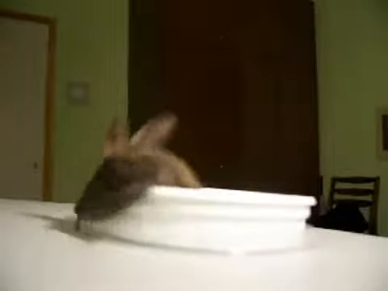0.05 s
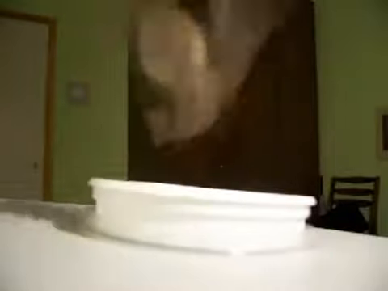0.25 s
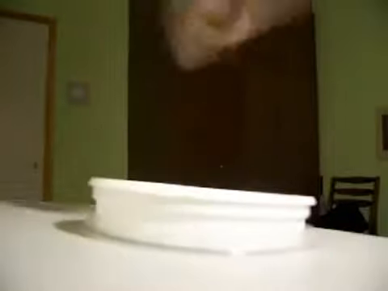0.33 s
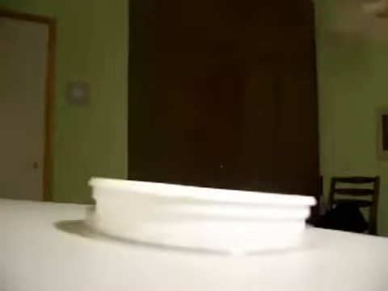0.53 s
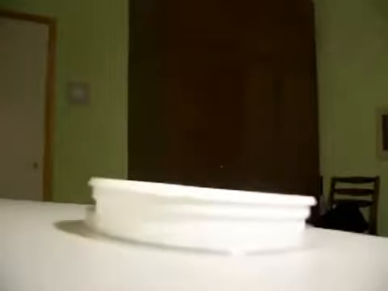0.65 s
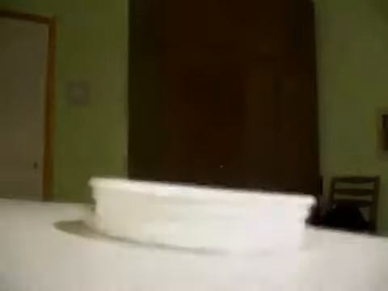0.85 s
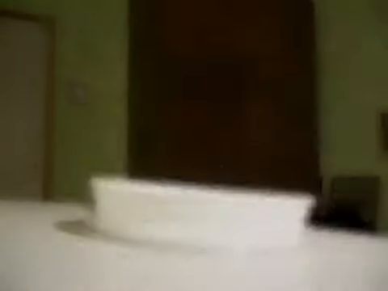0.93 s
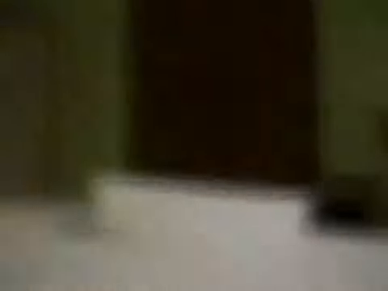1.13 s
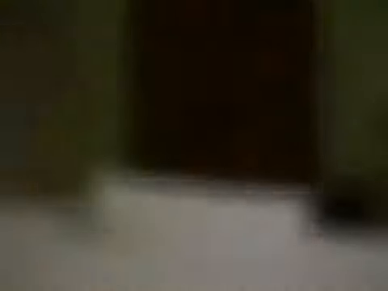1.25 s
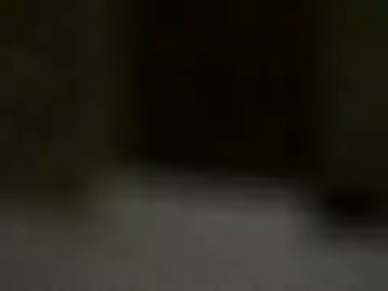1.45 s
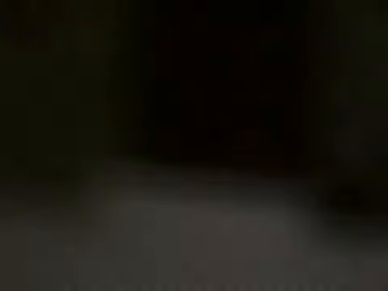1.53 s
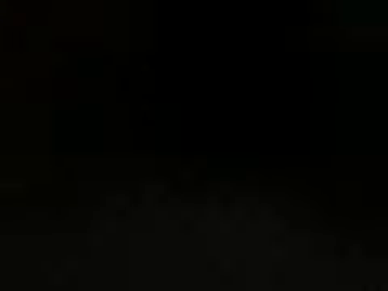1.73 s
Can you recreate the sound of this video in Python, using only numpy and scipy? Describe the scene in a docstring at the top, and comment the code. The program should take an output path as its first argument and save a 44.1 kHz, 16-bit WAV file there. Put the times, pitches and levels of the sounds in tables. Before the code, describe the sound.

Close bat wingbeats, soft low thumps of air, after a brief claw scratch on plastic.

```python
"""Bat taking off, close up

A quiet room, one microphone. A small bat scrapes its claws on a plastic tub, takes off and
flutters past at close range. Each wing stroke throws a puff of air that thumps and buffets the
microphone, with a faint rush of the wings. Behind lie room tone, hiss, hum and an electrical whine."""
import sys
import numpy as np
from scipy import signal
from scipy.fft import rfft, irfft
from scipy.io import wavfile

SR = 44100
rng = np.random.default_rng(int(sys.argv[2]) if len(sys.argv) > 2 else 0)


def pcm_store(signal):
    """Save signal as 16-bit PCM."""
    levels = np.round(np.clip(np.atleast_2d(signal), -1, 1) * 32767)
    wavfile.write(sys.argv[1], SR, levels.astype(np.int16).T)


N = 79380
T = np.arange(N) / SR
HZ = np.maximum(np.arange(N // 2 + 1) * SR / N, 1)


def amp(db):
    """Decibels to gain."""
    return 10 ** (np.asarray(db) / 20)


def unit(x):
    """Scale to rms 1."""
    return x / np.sqrt(np.mean(x ** 2))


def curve(rows):
    """Gain over time from rows of t/s, level/dB."""
    return amp(np.interp(T, *np.array(rows).T))


def colour(rows):
    """Gain over frequency from rows of f/Hz, level/dB."""
    hz, db = np.array(rows).T
    return amp(np.interp(np.log(HZ), np.log(hz), db))


def resonance(hz, width):
    """Response of one mode, 1 at its centre."""
    return 1 / (1 + 1j * (HZ ** 2 - hz ** 2) / (HZ * width))


def shape(x, response):
    """Filter by a frequency response."""
    return irfft(rfft(x) * response, N)


def noise(response):
    """Coloured noise of rms 1."""
    return unit(shape(rng.standard_normal(N), response))


def burst(at, attack_s, decay_s):
    """Envelope that swells to 1 and dies away."""
    return np.exp(-(np.minimum(T - at, 0) / attack_s) ** 2 - np.maximum(T - at, 0) / decay_s)


def excite(drive, envelope, response):
    """Gate a drive, filter it and give it the energy of its envelope."""
    return unit(shape(drive * envelope, response)) * np.sqrt(np.mean(envelope ** 2))


def wing_puffs():
    """Each stroke's vortex passes right over the microphone: a brief suction amid smaller eddies."""
    # puffs of air: t/s, thump level/dB, thump half-width/s, eddy level/dB, eddy corner/Hz, eddy decay/s
    puffs = [(.168, -38, 0.0048, -50, 90, 0.0089), (0.227, -25, 0.0082, -36, 133, 0.022),
             (0.3, -22.5, 0.0057, -37.5, 164, 0.0099), (.381, -19.5, 0.0056, -34, 90, 0.016),
             (0.4139, -13, .0016, -34, 233, .01), (.420, -7, 0.0031, -29, 185, 0.026),
             (.442, -16.5, 0.0036, -35.5, 173, 0.017), (0.502, -14, 0.0035, -28.5, 85, 0.013),
             (0.535, -21, 0.0046, -24, 95, 0.038), (0.58, -9.5, 0.0042, -18, 108, 0.03),
             (0.608, -12, 0.0089, -28, 90, 0.014), (0.639, -8, 0.0048, -26.5, 154, 0.036),
             (.676, -10, 0.0034, -31, 150, 0.028), (0.724, -15, 0.0038, -28.5, 137, 0.0075),
             (0.781, -28.5, 0.012, -39, 60, 0.015), (0.834, -16.5, 0.0066, -27.5, 102, 0.023),
             (0.896, -15, 0.0073, -27, 88, 0.023), (.964, -23, 0.0054, -46, 75, 0.024),
             (1.002, -25, 0.0062, -34.5, 79.5, 0.021), (1.04, -31, 0.0053, -54, 70, 0.014)]
    eddy_low_hz, eddy_slope = 24, 4.23
    out = np.zeros(N)
    for at, thump_db, half_width, eddy_db, corner_hz, decay in puffs:
        u = (T - at) / half_width
        vortex = (1 - u ** 2 / 2) / (1 + u ** 2 / 4) ** 3.5
        band = 1 / (1 + (HZ / corner_hz) ** eddy_slope) / (1 + (eddy_low_hz / HZ) ** 2)
        envelope = burst(at, attack_s=0.02, decay_s=decay)
        eddies = excite(rng.standard_normal(N), envelope, band)
        out += amp(eddy_db) * eddies - amp(thump_db) * vortex
    return out


def wake():
    """Stirred air rumbles on at the microphone between strokes."""
    # strength of the wake: t/s, level/dB
    levels = [(0, -58), (.14, -55.5), (.22, -37.5), (.45, -32.5), (.62, -17.5), (.76, -39), (1, -47.5),
              (1.12, -48.5), (1.28, -49), (1.4, -62), (1.8, -63)]
    # spectrum of the rumble: f/Hz, level/dB
    spectrum = [(12, -13.5), (30, -3), (55, -8.5), (100, -23.5), (200, -35), (400, -65.5), (1000, -85.5)]
    return curve(levels) * noise(colour(spectrum))


def wing_rush():
    """Air rushes over the wings as they come near, with a slight flicker."""
    # strength of the rush: t/s, level/dB
    levels = [(0, -68.5), (.35, -70.5), (.395, -62.5), (.422, -53.5), (.465, -65.5), (.51, -58.5),
              (.58, -53.5), (.645, -54), (.70, -60.5), (.79, -65.5), (.84, -61), (.865, -65.5), (.895, -58),
              (.95, -68), (1.2, -70)]
    # spectrum of the rush: f/Hz, level/dB
    spectrum = [(150, 2), (400, 1.5), (800, 1), (1300, 2), (2300, -2), (4000, -1.5), (6800, -4),
                (8500, -10.5), (10000, -22.5)]
    flicker_db, flicker_corner_hz = 1, 120
    flicker = amp(flicker_db * noise(1 / (1 + (HZ / flicker_corner_hz) ** 2)))
    return curve(levels) * flicker * noise(colour(spectrum))


def claw_scrapes():
    """Each scrape is a run of tiny slips, strongest around its own frequency, that ring the tub."""
    # scrapes: t/s, level/dB, decay/s, centre f/Hz, fall-off/(dB per squared octave, sign ignored)
    scrapes = [(0.1026, -41.5, 0.0038, 4270, 6.5), (0.109, -54.5, .004, 5500, 2),
               (.128, -60, 0.013, 5500, -6), (.1512, -42.5, 0.0015, 4200, 2),
               (0.155, -50, 0.0093, 1480, 0.5), (0.1613, -45.5, 0.0047, 3200, 2),
               (0.169, -54.5, 0.0025, 3500, -3)]
    # spectrum of claw on plastic: f/Hz, level/dB
    claw_spectrum = [(300, -4), (900, 0.5), (2000, -3), (3600, -3.5), (5400, 0), (6200, -5), (7300, -5),
                     (8200, -7.5), (10000, -12.5)]
    # modes of the tub: f/Hz, width/Hz, level/dB
    tub_modes = [(1520, 310, 8), (2570, 65, 7), (3760, 430, 4.5), (4150, 180, -10), (5170, 280, -4),
                 (6800, 330, -3)]
    slips_per_s, slip_spread_db = 10000, 3.5
    ringing = sum(amp(db) * resonance(hz, width) for hz, width, db in tub_modes)
    body = colour(claw_spectrum) * (1 + ringing)
    out = np.zeros(N)
    for at, db, decay, centre_hz, fall_db in scrapes:
        slipping = rng.random(N) < slips_per_s / SR
        strength = amp(slip_spread_db * rng.standard_normal(N))
        slips = slipping * strength * np.sign(rng.standard_normal(N))
        contact = amp(-abs(fall_db) * np.log2(HZ / centre_hz) ** 2)
        envelope = burst(at, attack_s=0.00057, decay_s=decay)
        out += amp(db) * excite(slips, envelope, body * contact)
    return out


def room_tone():
    """The quiet room and hiss with a faint wavering hum, rising a little overall."""
    # strength of the background: t/s, level/dB
    levels = [(0, -59), (.2, -54), (.5, -56.5), (.9, -53.5), (1.3, -52.5), (1.8, -53)]
    # spectrum of room and hiss: f/Hz, level/dB
    spectrum = [(25, 5), (70, 8.5), (130, 3.5), (220, 1.5), (340, -1.5), (480, -6), (800, -9.5),
                (1400, -14.5), (2800, -18), (5000, -19.5), (7000, -24.5), (8500, -30.5), (10000, -39)]
    hum = amp(-17.5) * noise(resonance(hz=325.2, width=28) ** 2)  # level relative to the room
    return curve(levels) * (noise(colour(spectrum)) + hum)


def electrical_whine(hz=4290.5):
    """One thin, steady pitch that fades up far in the background."""
    # strength of the whine: t/s, rms level/dB
    levels = [(0, -81.5), (.3, -72.5), (.9, -71), (1.8, -71)]
    return curve(levels) * np.sqrt(2) * np.sin(2 * np.pi * hz * T)


def scene():
    """The room behind, the bat close by, in mono."""
    background = room_tone() + electrical_whine()
    return (background + wake() + wing_rush() + wing_puffs() + claw_scrapes())[None]


def record(dry):
    """The microphone loses the deepest bass and the top."""
    low_hz, top_hz = 8.5, 10300
    low_cut = signal.butter(1, low_hz, "high", fs=SR, output="sos")
    high_cut = signal.ellip(10, .2, 70, top_hz, fs=SR, output="sos")
    return signal.sosfilt(high_cut, signal.sosfilt(low_cut, dry))


dry = scene()
out = record(dry)
pcm_store(out)
```